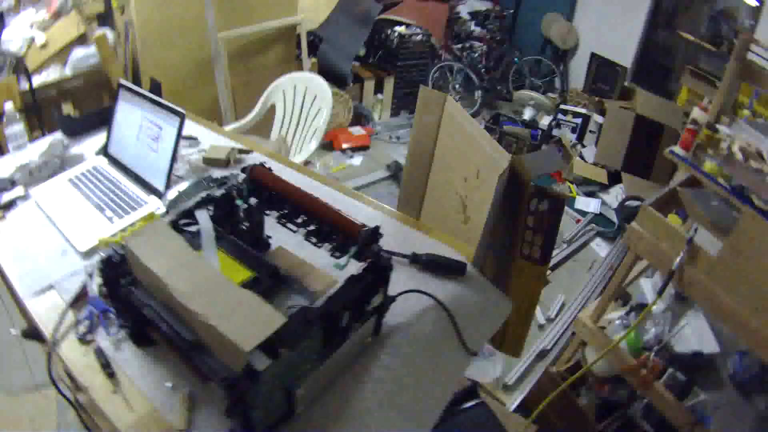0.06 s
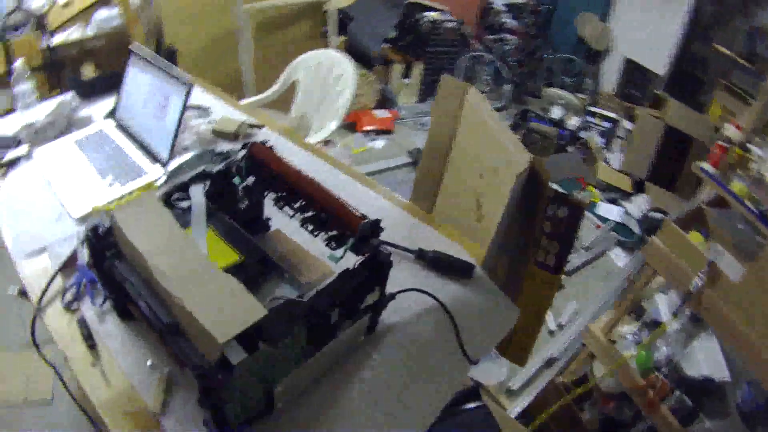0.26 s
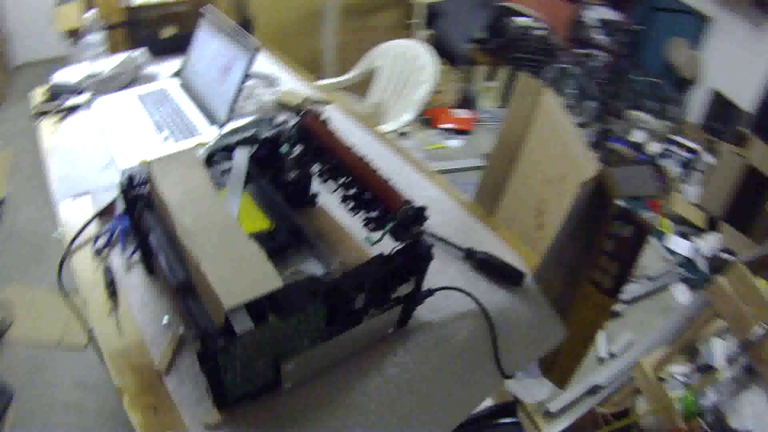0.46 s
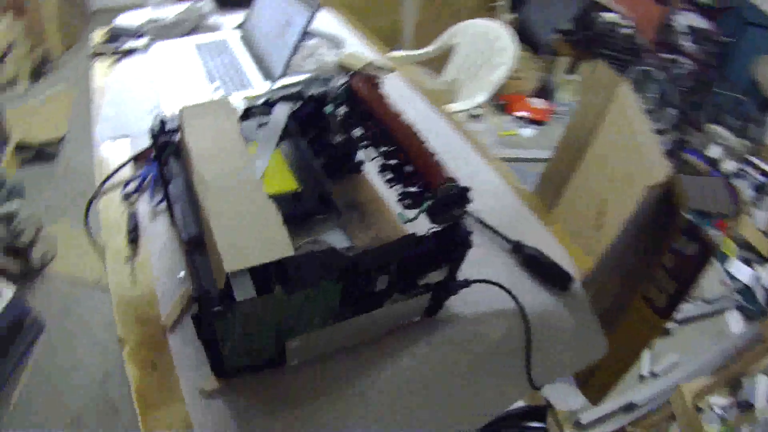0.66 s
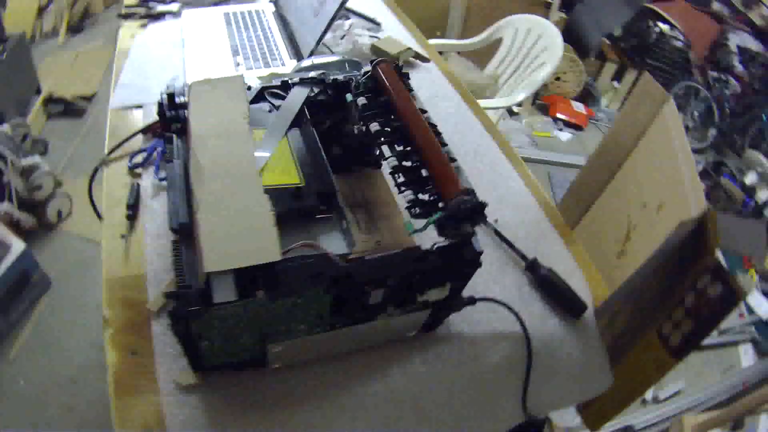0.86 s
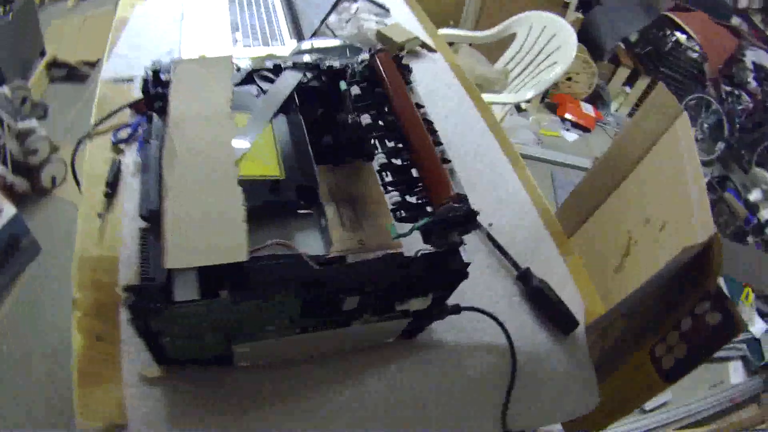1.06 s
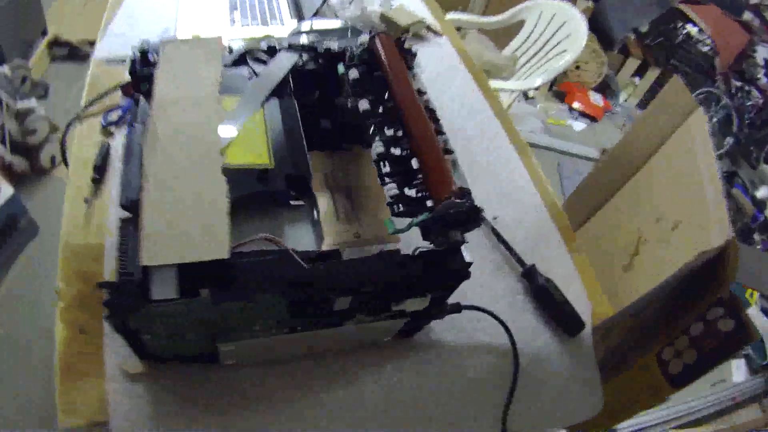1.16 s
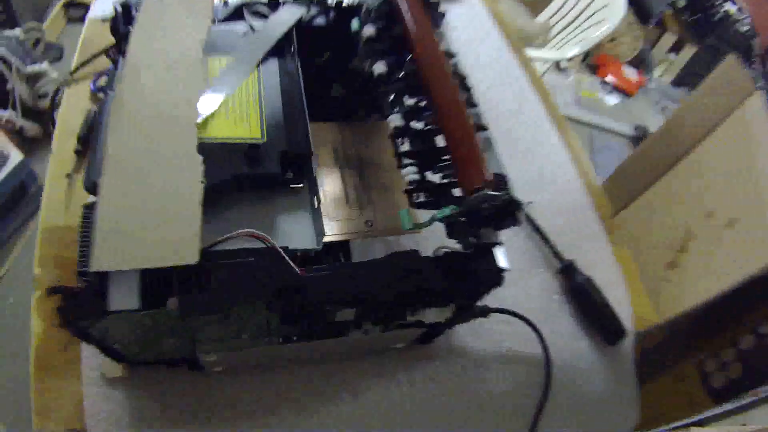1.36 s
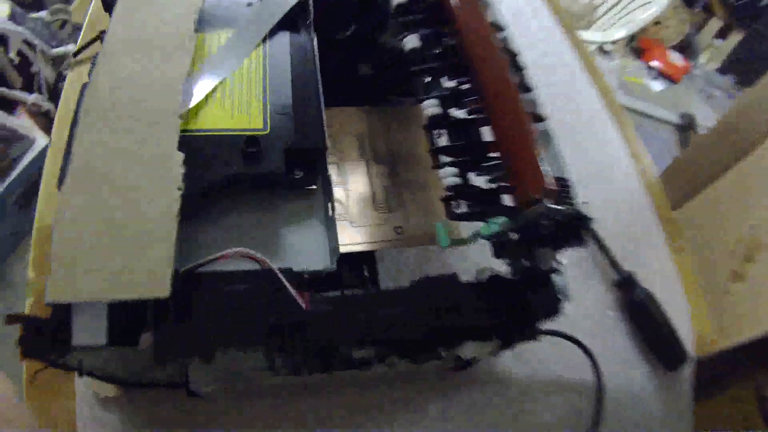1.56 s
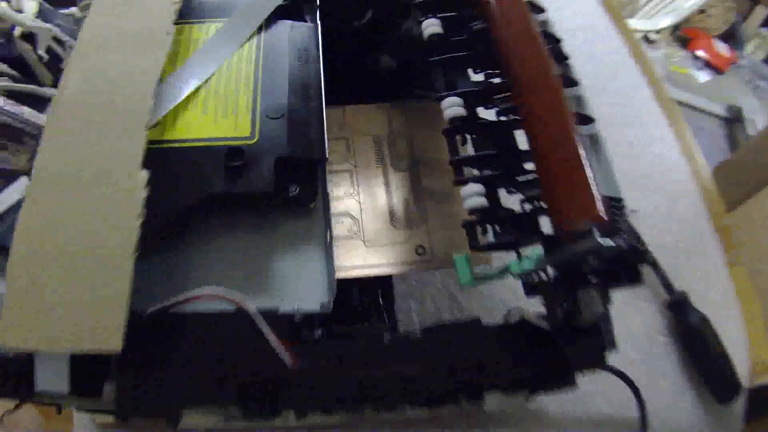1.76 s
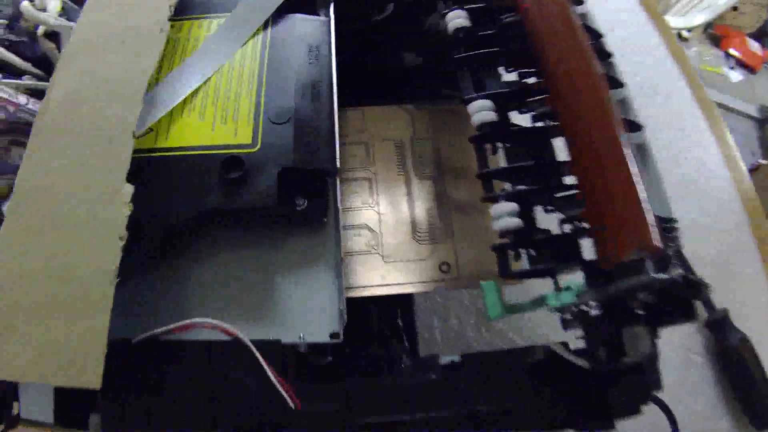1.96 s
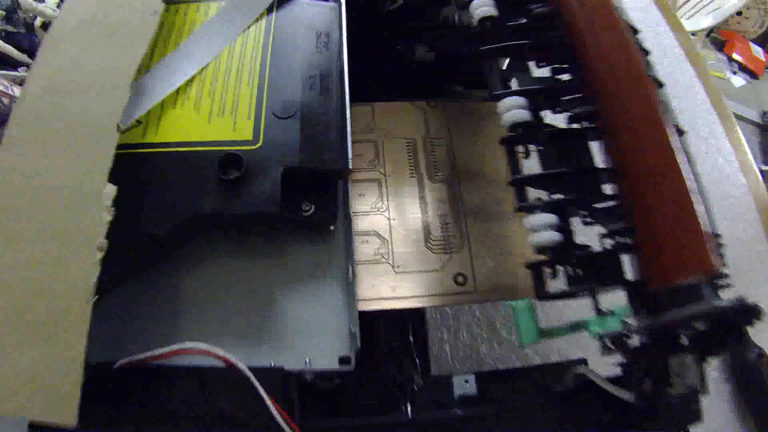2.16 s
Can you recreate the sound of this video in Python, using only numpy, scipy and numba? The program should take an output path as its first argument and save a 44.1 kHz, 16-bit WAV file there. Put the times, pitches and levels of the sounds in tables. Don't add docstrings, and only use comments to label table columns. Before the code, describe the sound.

An opened printer on a workshop bench whines at a steady mid pitch over grainy roller whirr. Handling knocks rattle the microphone's plastic housing, hardest at 0.2 s, with more until 0.65 s. The whine holds alone until about 1.17 s, then glides lower and weaker, with clatter at 1.3 to 1.6 s and small knocks from 2.0 to 2.2 s. Muffled, with low rumble and constant thin hiss.

```python
import sys
import numpy as np
from scipy import signal
from scipy.fft import rfft, irfft
from scipy.io import wavfile
from scipy.ndimage import uniform_filter1d
from numba import njit

SR = 44100
rng = np.random.default_rng(int(sys.argv[2]) if len(sys.argv) > 2 else 0)


def store_wav(level_fs):
    pcm = np.round(np.clip(np.atleast_2d(level_fs), -1, 1) * 32767)
    wavfile.write(sys.argv[1], SR, pcm.T.astype(np.int16))


def amplitude_ratio(level_db):
    exponent = np.asarray(level_db, float) / 20
    return 10 ** exponent


N = 98343

RUN_HZ, IDLE_HZ = 74.48, 43.6
CUT_S, COAST_S, EASE_S = 1.165, 0.47, 0.01

# turn_multiple, level_db at speed, change_db once slowed
MESH_TONES = [(7, -1, 2), (14, -13.5, 0), (21, -10, -1), (28, -15.5, 11), (35, -54, 20), (42, -36, 18)]
# turn_multiple, level_db at speed, change_db once slowed
POLE_TONES = [(12, -11.5, -14), (16, -11, -7), (20, -1, 4), (24, -3, 2), (32, -15, 14), (36, -27.5, 27),
              (40, -26, 22.5), (44, -29, 16)]
# time_s, mesh_db, mesh_overtones_db, poles_db, whirr_db, whirr_tilt_db per octave
DRIVE_LEVELS = [(0, -37.5, -8, -46, -44, -1), (.1, -37.5, -1, -50, -43, 0.5),
                (.25, -40.5, 6.5, -52, -41, 0), (.4, -35.5, 0.5, -54, -35, -0.5),
                (.55, -33.5, -1, -45.5, -39, 0), (.75, -32, -1.5, -52.5, -42.5, 0),
                (.95, -32, -1.5, -54, -39.5, 0), (1.1, -34.5, -1, -65, -35.5, 1),
                (1.2, -34, 2, -74, -35.5, 1.5), (1.28, -41, -8, -48, -37, -0.5),
                (1.42, -42, -1, -52, -40, -4), (1.55, -47, 2.5, -55, -41, -4),
                (1.68, -48.5, 8, -53.5, -42.5, -3), (1.8, -52.5, 8, -49.5, -46.5, -3),
                (1.95, -47.5, -9, -54, -41.5, -0.5), (2.1, -48, 3, -50.5, -44, 0.5),
                (2.23, -51, 9, -56.5, -40.5, -0.5)]
# pitch_hz, gain_db
FRAME_COLOUR = [(600, -1), (870, 4), (1060, -3.5), (1270, 4.5), (1500, -4), (1750, -6), (1950, 5.5),
                (2090, 6.5)]
# time_s, gain_db
BENCH_REFLECTION = [(0, 13), (.26, 0.5), (.5, -3), (.78, 3), (1.05, -1), (1.4, 8.5), (1.75, 3.5), (2.2, 1)]
# pitch_hz, level_db per Hz
WHIRR_SPECTRUM = [(35, -54), (120, -21.5), (330, -2.5), (700, -0.5), (1100, -3), (2100, 0.5), (2400, -8),
                  (2900, -37)]
# pitch_hz, level_db per Hz
HISS_SPECTRUM = [(2060, -36), (3500, -5), (5430, -3.5), (14600, -6.5), (15000, -6)]
# pitch_hz, level_db, t60_s
HOUSING_MODES = [(232, -6, 0.063), (343.3, 2, 0.2), (426, 3.5, 0.031), (560, -2.5, 0.031), (690, -0.5, 0.1),
                 (875, -2, 0.08), (1178, -2.5, 0.065), (1495, 4, 0.018), (1800, 6, 0.014),
                 (1970, 0.5, 0.016), (2520, -3.5, 0.015), (2810, -9, 0.018)]
# start_s, level_db, centre_hz, spread_octaves
KNOCK_EVENTS = [(.096, -26.5, 790, 0.35), (0.2232, -14.5, 790, 0.92), (.231, -15, 616, 1.1),
                (0.246, -25, 1300, .8), (0.277, -25, 800, 0.45), (0.322, -35.5, 504, 0.68),
                (0.33, -18, 1060, 0.35), (0.401, -16.5, 1180, 0.22), (.417, -31, 1010, 0.9),
                (.426, -37, 2000, 0.5), (.4835, -26, 1280, 0.57), (.481, -27, 342, 0.23),
                (0.501, -49, 510, 0.95), (.609, -26.5, 594, 0.68), (0.649, -28, 780, 1),
                (1.052, -29.5, 220, 0.72), (1.453, -25.5, 900, 1.2), (2.010, -26, 790, 0.37),
                (2.125, -32.5, 1070, 0.56), (2.223, -26.5, 1220, 0.52)]
# start_s, length_s, level_db, centre_hz, spread_octaves
RATTLE_EVENTS = [(0.2238, 0.0088, -18, 1960, 0.32), (0.244, 0.022, -30.5, 1200, 1.4),
                 (0.308, 0.065, -39.5, 345, 1.7), (0.401, 0.021, -42, 1290, 0.47),
                 (1.122, 0.13, -42, 1040, 0.4), (1.303, 0.065, -31.5, 610, 0.6),
                 (1.305, 0.054, -32.5, 1280, 0.8), (1.31, 0.14, -29, 236, 0.25),
                 (1.455, 0.029, -31, 1440, 0.76), (1.479, 0.053, -38.5, 1000, 1.32),
                 (1.578, 0.068, -36.5, 1290, 0.82)]
# peak_s, peak_db, pitch_hz, rise_ms
TAP_EVENTS = [(.097, -28, 710, 2.3), (.097, -26.5, 1750, 0.62), (.2230, -3.5, 690, 1.49),
              (.2275, -14, 645, 1.3), (.2238, -17.5, 1800, 2.5), (.2272, -22.5, 2130, 1.7),
              (.2325, -27, 1100, 1.5), (.223, -28.5, 2650, 2), (0.245, -28, 2660, 2),
              (0.246, -21, 1250, 2.4), (.250, -27, 1800, 1.5), (.253, -33, 2700, 1.2),
              (.402, -30, 1490, 1.7), (0.427, -30.5, 2840, 2.7), (.427, -27, 3800, 2.5),
              (.4828, -24, 863, 2.8), (.504, -29, 1760, 1.5), (.505, -30, 560, 3.9), (1.305, -27, 447, 1.4),
              (1.3132, -20.5, 547, 4.1), (1.316, -37, 1900, 2), (1.323, -26.5, 493, 2.3),
              (1.33, -27, 284, 7.4), (1.345, -26, 594, 3.4), (1.351, -38, 1250, 2.5),
              (1.354, -28, 527, 3.7), (1.365, -33, 590, 2.8), (1.378, -30, 1280, 4.2),
              (1.455, -25, 1760, 2.8), (1.456, -25, 780, 2.6), (1.458, -21, 440, 3.6),
              (1.462, -28, 1390, 3), (1.466, -25, 860, 1.1), (1.471, -25, 344, 5.3), (1.478, -31, 1390, 2),
              (1.481, -23, 387, 6.1), (1.514, -28, 760, 2.6), (1.585, -29, 760, 2.2),
              (1.585, -34, 1470, 2.6), (1.598, -26, 795, 1.6), (1.62, -32.5, 476, 1.7),
              (1.638, -32, 323, 4.8), (2.127, -29, 955, 1.3), (2.128, -35.5, 2080, 1.9),
              (2.127, -44, 2660, 1.5), (2.178, -35, 1800, 3), (2.194, -38, 1720, 3.7),
              (2.225, -35.5, 940, 2), (2.226, -28, 1740, 1.5), (2.225, -38, 2670, 2)]
# start_s, length_s, level_db, first_hz, last_hz
HUM_EVENTS = [
    (.43, .62, -60, 120, 152),
    (.22, .1, -55, 125, 125),
    (1.7, .35, -72, 150, 120),
    (1.32, .12, -72, 55, 45),
    (1.04, .04, -41, 215, 200),
    (2.09, .07, -60, 60, 50),
    (2.13, .14, -59, 140, 145),
]


@njit
def svf(x, hz, width):
    y, band, low = np.empty(len(x)), 0., 0.
    g, k = np.tan(np.pi * hz / SR), width / hz
    for i in range(len(x)):
        v = (band + g * (x[i] - low)) / (1 + g * (g + k))
        band, low, y[i] = 2 * v - band, low + 2 * g * v, k * v
    return y


def noise():
    return rng.standard_normal(N)


def level(x, db):
    return x * amplitude_ratio(db) / np.sqrt(np.mean(x ** 2))


def walk(rate):
    k = int(SR / rate)
    held = np.repeat(rng.standard_normal(N // k + 1), k)
    return 1.21 * uniform_filter1d(uniform_filter1d(held, k), k)[:N]


def tint(table, hz):
    table_hz, table_db = np.array(table).T
    return np.interp(np.log(hz), np.log(table_hz), table_db)


def drive(t, column):
    table = np.array(DRIVE_LEVELS)
    return np.interp(t, table[:, 0], table[:, column])


def high_pass(x, order, hz):
    return signal.sosfilt(signal.butter(order, hz, "high", fs=SR, output="sos"), x)


def spread(mid, side):
    return mid + side * np.array([[1], [-1]])


def shaft(t):
    late = np.hypot(np.maximum(t - CUT_S, 0), EASE_S) - EASE_S
    slowed = 1 - np.exp(-late / COAST_S)
    hz = (RUN_HZ + (IDLE_HZ - RUN_HZ) * slowed) * (1 + 0.0013 * walk(40.74))
    turn = 2 * np.pi * np.cumsum(hz) / SR

    def tone(multiple, db, wobble_db):
        tone_hz = multiple * hz
        db = db + np.where(tone_hz < 2300, tint(FRAME_COLOUR, tone_hz), 0) + wobble_db * walk(17.84)
        return np.sqrt(2) * amplitude_ratio(db) * np.sin(multiple * turn + 2 * np.pi * rng.random())

    out = np.zeros(N)
    for i, (multiple, db, change_db) in enumerate(MESH_TONES):
        db = db + change_db * slowed + drive(t, column=1)
        wobble_db = 1.1
        if i > 0:
            db = db + drive(t, column=2)
            wobble_db += 0.43
        if i == 1:
            db = db + np.interp(t, *np.array(BENCH_REFLECTION).T)
        out += tone(round(multiple), db, wobble_db)
    for multiple, db, change_db in POLE_TONES:
        out += tone(round(multiple), db + change_db * slowed + drive(t, column=3), 0.35)
    return out


def whirr(t):
    out, shared_db = 0, 1.4 * walk(24.72)
    tilt_db = drive(t, column=5)
    for hz in 35 * 2 ** (np.arange(22) / 3):
        grit = noise() * amplitude_ratio(1.5 * walk(300))
        band = level(svf(svf(grit, hz, hz / 3), hz, hz / 3), 0)
        db = tint(WHIRR_SPECTRUM, hz) + 10 * np.log10(hz)
        db = db + shared_db + 0.88 * walk(13.9) + tilt_db * np.log2(hz / 1000)
        out = out + amplitude_ratio(db) * band
    return level(out / amplitude_ratio(tilt_db), 0) * amplitude_ratio(drive(t, column=4) + tilt_db)


def leak(t):
    return level(svf(noise(), 3510.0, 890.0), -67) * amplitude_ratio(0.74 * (drive(t, column=4) + 44.5))


def housing_band(t):
    band = svf(svf(noise(), 2690.0, 300.0), 2690.0, 300.0)
    return level(band, -64.5) * amplitude_ratio(0.91 * (drive(t, column=4) + 41.5))


def rumble():
    def murmur():
        band = svf(svf(noise(), 167.0, 190.0), 110.0, 230.0)
        return level(band * amplitude_ratio(1.0 * walk(4.4)), -68.5)
    return spread(murmur(), amplitude_ratio(-36) * murmur())


def hiss():
    hz = np.maximum(np.arange(N // 2 + 1) * SR / N, 1)
    shape = amplitude_ratio(tint(HISS_SPECTRUM, hz)) / np.sqrt(1 + (1800 / hz) ** 4)
    mid, side = (level(irfft(rfft(noise()) * shape, N), -62) for _ in range(2))
    side = side + level(svf(noise(), 410.0, 560.0), -78.5)
    return spread(mid, amplitude_ratio(-4) * side)


def strikes():
    rows = []
    for s, db, hz, octaves in KNOCK_EVENTS:
        rows.append((np.array([s, s + 0.5 / hz]), np.array([-0.6, 1.0]), db, hz, octaves))
    for s, length, db, hz, octaves in RATTLE_EVENTS:
        draw = rng.random((40, 3))
        at = np.cumsum(2 * draw[:, 0]) / 600
        fade = np.clip(1.3 - at / length, 0, 1) * (at < length)
        size = np.sign(draw[:, 1] - 0.5) * (1.04 + draw[:, 2]) * fade
        rows.append((s + at, size, db, hz, octaves))
    return rows


def housing():
    out, rows = np.zeros(N), strikes()
    luck = iter(rng.random((len(rows), 2 * len(HOUSING_MODES))).T)
    for mode_hz, mode_db, t60 in HOUSING_MODES:
        for detune in (0.975, 1.025):
            push = np.zeros(N)
            for (at, size, db, hz, octaves), share in zip(rows, next(luck)):
                away = np.log2(mode_hz / hz) / octaves
                gain = amplitude_ratio(db + mode_db - 12 * away ** 2) * (0.42 + 0.57 * share)
                np.add.at(push, np.minimum((at * SR).astype(int), N - 1), gain * size)
            touch = np.hanning(int(0.7 * SR / mode_hz) + 3)
            push = np.convolve(push, 1.42 * touch / touch.sum(), "same")
            pole = np.exp(2j * np.pi * mode_hz * detune / SR - np.log(1000) / (t60 * SR))
            out += 0.29 * signal.lfilter([1], [1, -pole], push).imag
    return high_pass(out, 4, 250)


def taps(t):
    out = np.zeros(N)
    for s, db, hz, rise_ms in TAP_EVENTS:
        near = slice(max(int((s - 0.01) * SR), 0), int((s + 0.04) * SR))
        after = t[near] - s
        u = np.maximum(1 + after * 1000 / rise_ms, 0)
        out[near] += amplitude_ratio(db) * (u * np.exp(1 - u)) ** 2 * np.cos(2 * np.pi * hz * after)
    return high_pass(out, 2, 160)


def muffle(x):
    return signal.sosfilt(signal.cheby1(6, 1, 3050, fs=SR, output="sos"), x)


def hums(t):
    out = 0
    for s, length, db, first_hz, last_hz in HUM_EVENTS:
        u = np.clip((t - s) / length, 0, 1)
        hz = first_hz + (last_hz - first_hz) * np.sqrt(u)
        swell = amplitude_ratio(db + 2 * walk(4.4)) * np.sin(np.pi * u) ** 0.89
        out = out + swell * np.sin(2 * np.pi * np.cumsum(hz) / SR)
    return out


def scene():
    t = np.arange(N) / SR
    knocks = housing()
    bright_whirr = leak(t) + housing_band(t)
    whine = shaft(t)
    muffled = muffle(whirr(t) + knocks + taps(t))
    return whine + muffled + bright_whirr + hums(t) + rumble() + hiss()


def roll_off(x):
    return signal.sosfilt(signal.butter(12, 15200, fs=SR, output="sos"), x)


def record(dry):
    mix = signal.sosfilt(signal.ellip(8, 0.2, 70, 15300, fs=SR, output="sos"), dry)
    return roll_off(mix)


dry = scene()
out = record(dry)
store_wav(out)
```